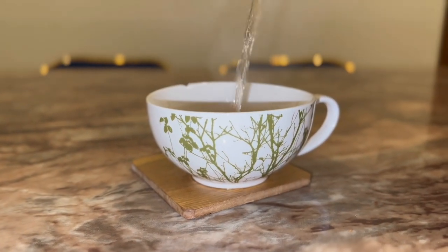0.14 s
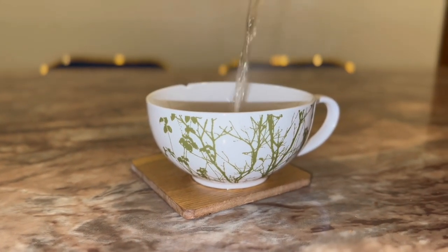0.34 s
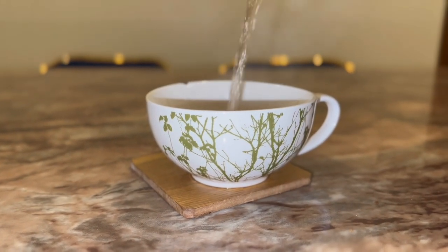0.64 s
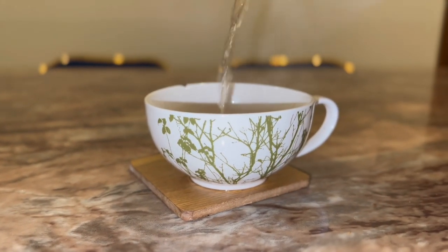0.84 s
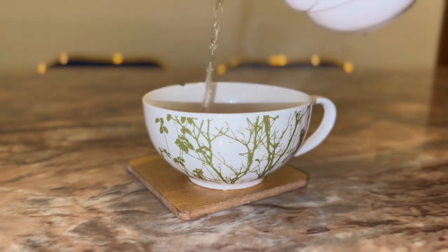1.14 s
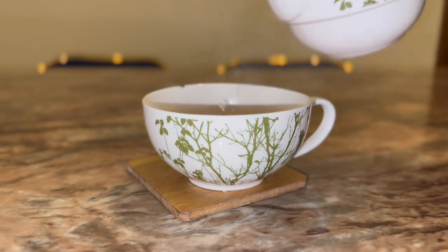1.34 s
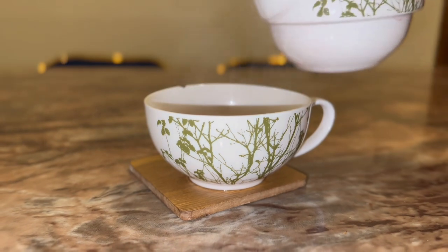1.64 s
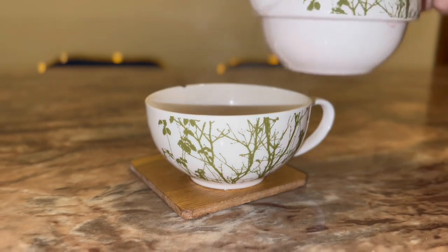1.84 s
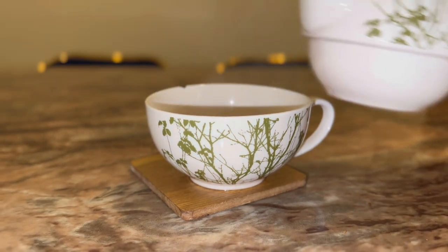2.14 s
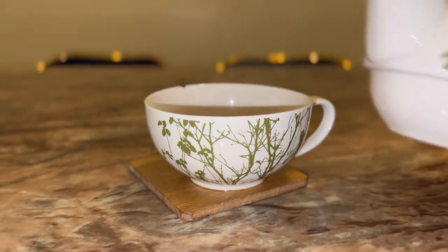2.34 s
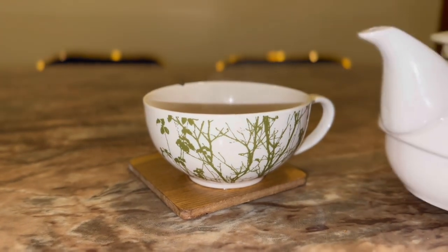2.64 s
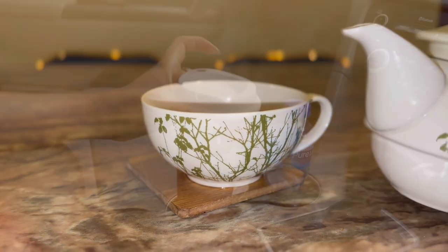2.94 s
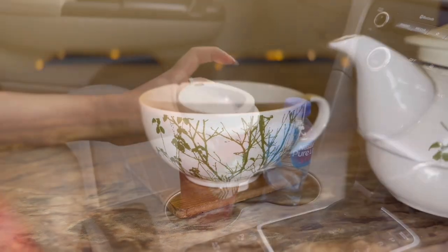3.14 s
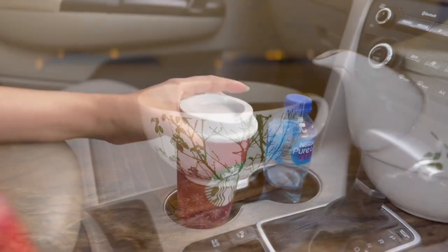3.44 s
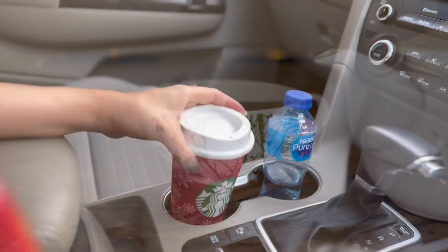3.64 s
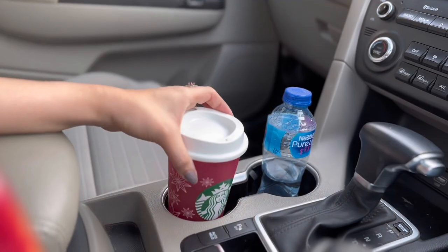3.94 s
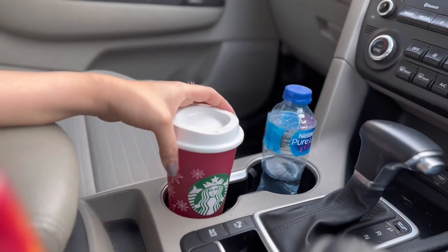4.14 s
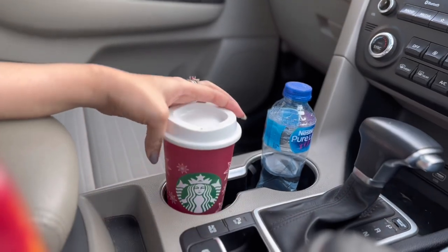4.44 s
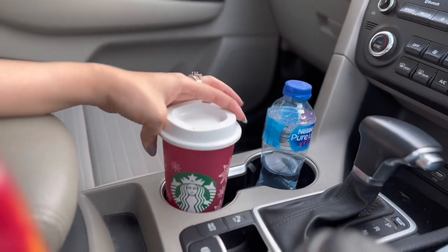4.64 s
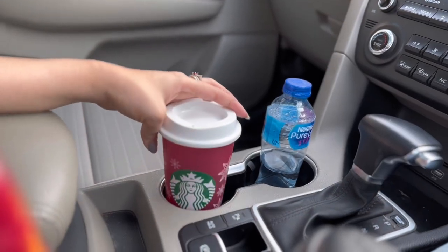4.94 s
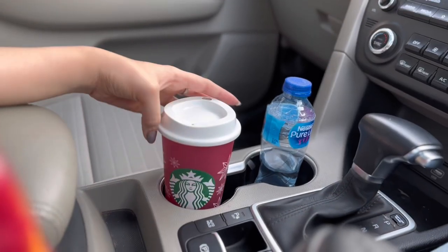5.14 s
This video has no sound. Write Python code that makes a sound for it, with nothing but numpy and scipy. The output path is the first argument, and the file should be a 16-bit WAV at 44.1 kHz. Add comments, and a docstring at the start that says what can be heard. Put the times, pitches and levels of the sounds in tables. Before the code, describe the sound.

Close stereo pickup in a small, quiet room: hot tea streams into a china cup with bubbling plops and bright droplet snaps, then breaks off. The pot's lid taps lightly, the pot lands on the table with a hard, booming knock, and the lid taps again. The room's rumble blends into an idling car, where a paper cup scrapes its holder, thumps down and its plastic lid clacks.

```python
"""Tea runs from a china pot into a full cup: trapped air pockets ring, droplets snap and foam sizzles.
After the stream has stopped, the pot's lid taps, exciting the pot's hollow and damped modes of its china.
The pot is set down: a noisy contact excites table modes that boom, a small room answers the knock, and
the lid taps once more. The room's rumble fades into an idling car's cabin, both filtered noise, where a
paper cup scrapes its holder in bursts of noise, thumps the console's low modes and clacks its plastic lid."""
import sys
import numpy as np
from scipy import signal
from scipy.fft import rfft, irfft, next_fast_len
from scipy.io import wavfile
from scipy.ndimage import map_coordinates

SR = 44100
rng = np.random.default_rng(int(sys.argv[2]) if len(sys.argv) > 2 else 0)


def unload_wav(signal):
    """Save mono or channel-first audio to the path in sys.argv[1] as 16-bit WAV at rate SR, clipped to [-1, 1]."""
    wavfile.write(
        sys.argv[1],
        SR,
        np.round(np.clip(np.atleast_2d(signal).T, -1, 1) * 32767).astype(np.int16),
    )


N = 233456
TIME = np.arange(N) / SR
AGE = TIME[:SR]  # time since the onset of a single event
TOP_HZ = 15900  # upper band limit


def amp(db):
    """Decibel law: a level becomes an amplitude gain."""
    return 10 ** (np.asarray(db) / 20)


def unit(x):
    """Normalisation of power: scale to rms 1."""
    return x / np.sqrt(np.mean(x ** 2) + 1e-20)


def along(points, hz):
    """Logarithmic frequency scale: interpolate (f/Hz, value) points on it."""
    f, v = np.transpose(points)
    return np.interp(np.log(hz + 1), np.log(f + 1), v)


def pan(db):
    """Interaural level difference: left and right gains, positive to the left."""
    return amp([[db / 2], [-db / 2]])


def add(track, s, sound):
    """Superposition: mix a sound into a track at time s."""
    part = track[..., max(round(s * SR), 0):][..., :sound.shape[-1]]
    part += sound[..., :part.shape[-1]]


def ramp(start, length):
    """Linear crossover: rise from 0 at start to 1 over length seconds."""
    return np.clip((TIME - start) / length, 0, 1)


def fade(t, rise, t60):
    """Exponential damping after a quick swell; the decay falls 60 dB in t60 seconds."""
    return (1 - np.exp(-t / rise)) * np.exp(-np.log(1000) * t / t60)


def wobble(rate):
    """Band-limited fluctuation: a smooth random curve with rate knots a second."""
    knots = rng.standard_normal(int(N * rate / SR) + 4)
    return map_coordinates(knots, [TIME * rate])


def filtered(x, response):
    """Linear filtering: multiply the spectrum by a response of frequency."""
    m = next_fast_len(x.shape[-1] + SR // 4)
    spectrum = rfft(x, m) * response(np.fft.rfftfreq(m, 1 / SR))
    return irfft(spectrum, m)[..., :x.shape[-1]]


# left-right coherence in the room: (f/Hz, correlation)
ROOM_COHERENCE = [(60, 0.97), (130, 0.95), (290, 0.84), (640, 0.17), (1400, 0.05), (6000, 0.041),
                  (14000, .5)]
# left-right coherence in the car: (f/Hz, correlation)
CAR_COHERENCE = [(60, 1), (170, 0.93), (500, 0), (1600, 0.019), (5000, 0), (15000, 0.54)]


def noise(spectrum, coherence, size=N, tilt_db=0):
    """Partial coherence: coloured mid and side noises, mixed to stereo of rms 1."""
    def mid_side_response(hz):
        colour = amp(along(spectrum, hz) + tilt_db * np.log2(hz + 1))
        angle = np.arccos(np.clip(along(coherence, hz), -1, 1)) / 2
        return colour * [np.cos(angle), np.sin(angle)]
    mid, side = filtered(rng.standard_normal((2, size)), mid_side_response)
    return unit(np.array([mid + side, mid - side]))


def ring(modes, rise, scatter_db, apart_hz):
    """Modal synthesis: damped modes at random strengths, the higher ones out of step between the ears."""
    out = np.zeros((2, SR))
    for hz, db, t60 in modes:
        skew = np.array([[1], [-1]]) * rng.choice([-1, 1]) * np.pi / 4 * hz / (hz + apart_hz)
        phase = rng.uniform(0, 2 * np.pi) + skew
        strength = amp(db + scatter_db * rng.standard_normal())
        out += strength * np.sin(2 * np.pi * hz * AGE + phase) * fade(AGE, rise, t60)
    return out


# reverberation time of the walls: (f/Hz, t60/s)
WALL_DECAY = [(100, 0.95), (300, 0.8), (1000, 0.56), (3000, 0.65), (8000, 0.16), (15000, 0.098)]


def room(x):
    """Diffuse reverberation: convolve with noise whose every frequency dies at its own speed."""
    hz, t, z = signal.stft(rng.standard_normal((2, SR)), SR, nperseg=256)
    decay = np.exp(-np.log(1000) * t / along(WALL_DECAY, hz)[:, None])
    tail = signal.istft(z * decay, SR, nperseg=256)[1][:, :SR]
    tail = tail * (1 - np.exp(-(AGE / 0.0063) ** 2))  # the echoes take a few ms to gather
    return signal.fftconvolve(x, tail / np.linalg.norm(tail[0]), axes=1)[:, :N]


def bubble(hz, cycles, climb):
    """Bubble resonance: an air pocket rings, its pitch climbing as it nears the surface."""
    t = AGE[:int(SR * cycles / hz) + 2]
    life = cycles / hz
    phase = 2 * np.pi * hz * t * (1 + climb * (t / life - .5))
    wave = np.sin(phase) * fade(t, 1 / hz, life)
    return wave / np.abs(wave).max()


def swarm(end, rate, hz, octaves, cycles, spread_db):
    """Random superposition: bubbles up to time end, mostly faint, each panned; rms 1 while they last."""
    out = np.zeros((2, N))
    for when, size, pitch, place in rng.random((int(rate * end), 4)):
        own_hz = min(hz * 2 ** (octaves * (2 * pitch - 1)), TOP_HZ)
        gain = amp(spread_db * size ** 2) * pan(10 * (place - .5))
        add(out, when * end, gain * bubble(own_hz, cycles, climb=0.13))
    return unit(out) * np.sqrt(end * SR / N)


def snap(hz):
    """Impact noise: a droplet's brief crack on the surface, a noise band centred on hz."""
    band = [(hz / 4, -18), (hz * 0.7, -11), (hz, 0), (hz * 1.35, -13), (hz * 1.8, -16)]
    crack = noise(band, ROOM_COHERENCE, size=2048)
    return crack * fade(AGE[:crack.shape[1]], 0.00115, 0.011)


def plop(hz):
    """Air entrainment: a pocket pinches off with a short splash and rings."""
    spectrum = [(400, -46), (800, -1.5), (1300, 5.5), (2000, -18), (4000, -15.5), (9000, -37.5)]
    splash = noise(spectrum, ROOM_COHERENCE, size=2048)
    out = amp(-6) * splash * fade(AGE[:splash.shape[1]], .0004, .02)
    add(out, 0, amp(0.5) * bubble(hz, cycles=13.0, climb=0.13))
    return out


POCKET_DELAY_S, SNAP_HZ = .0008, 8620  # from the snap to the ring; the snap's centre
POUR_END_S, TAPER_S = 1.42, .12  # the stream thins out and breaks off
GURGLE_DB, GURGLE_SAG_DB_PER_S = -58.5, 0.5  # bed of large bubbles, calming as the cup fills
FOAM_DB, FOAM_SAG_DB_PER_S = -70.5, 18  # the foam's hiss, which outlasts the stream
SPRAY_DB, SURGE_DB = -63, 1  # the fine spray; how unevenly it comes
DROPLETS_PER_S, DROPLET_DB, DROPLET_SPREAD_DB = 26, -53.5, 13.5  # random droplets
# lumps of the stream hitting the tea, levels before panning:
# (t/s, plop level/dB, plop f/Hz, snap level/dB)
STREAM_LUMPS = [(0.049, -34.5, 810, -57.5), (0.079, -35.5, 830, -47), (0.12, -42, 1000, -40),
                (0.1358, -32, 1250, -35.5), (0.157, -37, 895, -49), (0.2, -43, 860, -52),
                (0.2727, -31, 1090, -25), (0.336, -36, 955, -28.5), (0.3595, -35, 920, -36),
                (0.396, -33.5, 990, -50), (0.425, -38.5, 670, -55), (0.497, -44.5, 830, -50),
                (0.542, -39, 747, -53), (0.5603, -41.5, 830, -38.5), (0.644, -40.5, 700, -53),
                (0.6886, -42, 990, -41), (0.737, -40, 710, -56), (1.037, -43, 900, -29),
                (1.051, -37.5, 916, -59), (1.1644, -35.5, 970, -31), (1.2165, -41.5, 886, -40.5),
                (1.302, -38.5, 730, -49)]
# stray droplets snapping on the surface, levels before panning: (t/s, level/dB, f/Hz)
STRAY_DROPLETS = [(0.3057, -35, 8760), (0.6594, -37.5, 14000), (0.689, -33, 13000), (1.005, -36.5, 14000),
                  (1.115, -34.5, 4130), (1.202, -36, 10000), (1.243, -37.5, 14000)]
# spectrum of spray and foam: (f/Hz, level/dB)
SPRAY_SPECTRUM = [(900, 1), (1800, -1), (3200, 1), (5000, -14), (7000, -4), (9000, -4), (12000, -11.5),
                  (15500, -10)]


def pour():
    """Bubble acoustics: the stream traps large bubbles, throws droplets and keeps a bed of small ones."""
    plops, spits = np.zeros((2, N)), np.zeros((2, N))
    for s, db, hz, snap_db in STREAM_LUMPS:
        add(spits, s, amp(snap_db) * snap(SNAP_HZ))
        add(plops, s + POCKET_DELAY_S, amp(db) * plop(hz))
    for s, db, hz in STRAY_DROPLETS:
        add(spits, s, amp(db) * snap(hz))
    for when, size, pitch in rng.random((int(DROPLETS_PER_S * POUR_END_S), 3)):
        gain = amp(DROPLET_DB + DROPLET_SPREAD_DB * size ** 2)
        own_hz = SNAP_HZ * 2 ** (1.4 * pitch - .7)
        add(spits, when * (POUR_END_S - TAPER_S / 2), gain * snap(own_hz))

    flow = 1 - ramp(POUR_END_S - TAPER_S, TAPER_S)
    gurgle = flow * amp(GURGLE_DB - GURGLE_SAG_DB_PER_S * TIME)
    spray = flow * amp(SPRAY_DB + SURGE_DB * wobble(14))
    large = swarm(1.45, rate=190, hz=1000, octaves=.65, cycles=13, spread_db=14)
    small = swarm(1.45, rate=220, hz=3100, octaves=.7, cycles=18, spread_db=12)
    tiny = swarm(1.45, rate=600, hz=9300, octaves=.75, cycles=24, spread_db=17)
    plops = pan(6.8) * (plops + gurgle * large)
    spits = pan(1.5) * spits + spray * (amp(-5.5) * small + amp(-11.0) * tiny)
    foam = amp(FOAM_DB - FOAM_SAG_DB_PER_S * np.maximum(TIME - POUR_END_S, 0))
    mist = (amp(-8) * spray + foam) * noise(SPRAY_SPECTRUM, ROOM_COHERENCE)
    return plops + amp(-13.0) * room(plops) + spits + amp(-7.0) * room(spits) + mist


# modes of the table under the pot: (f/Hz, level/dB, t60/s)
TABLE_MODES = [(63.8, -19, 0.6), (101, -6.5, 0.22), (155, -15, 1.4), (180.3, -13.5, .4), (251.6, -18, 1.6),
               (266.5, -11.5, 0.53), (293, -8, 0.28), (362, -6.5, .28), (382, -9.5, 0.77), (438, -12, 0.46),
               (481, -7, 0.41), (503.3, -5, 0.17), (596, -11, 0.31), (608, -7, 0.46), (663, 3.5, 0.23),
               (694, 2, 0.27), (745, -11.5, 0.297), (852, -9, 0.4), (961, -7.5, 0.6), (1052, -5.5, 0.36),
               (1125, -8, 0.2), (1296, -11, .3), (1330, -11.5, .3), (1381, -10.5, .32),
               (1429, -17.5, 0.408), (1690, -17, 0.381), (1758, -16, 0.4), (2200, -40, 0.44),
               (2650, -29, 0.39), (3770, -24, 0.094)]
# contact noise of the pot's foot: (f/Hz, level/dB)
FOOT_CONTACT = [(40, -27), (90, -19.5), (200, -5.5), (400, -3), (700, -3), (1000, -3), (1400, -9),
                (2000, -23.5), (3200, -41), (5000, -46), (9000, -47.5), (16000, -54.5)]


def teapot():
    """Impact excitation: the pot's foot grazes the table, then strikes it and the top booms."""
    out = np.zeros((2, N))
    contact = noise(FOOT_CONTACT, ROOM_COHERENCE, size=SR) * fade(AGE, 0.00022, 0.057)
    clonk = np.sin(2 * np.pi * 700 * AGE) * fade(AGE, .0004, 0.037)  # the wood right under the foot
    add(out, 2.6425, amp(-39) * contact)
    add(out, 2.6478, amp(-11.5) * contact + amp(-11.5) * clonk)
    out += amp(-6.5) * room(out)
    add(out, 2.6478, amp(-20) * ring(TABLE_MODES, rise=0.00026, scatter_db=0.7, apart_hz=200))
    return pan(1.8) * out


# the lid tapping on the pot, levels relative: (t/s, hollow level/dB, hollow f/Hz, hollow t60/s,
# pot level/dB, lid level/dB, table level/dB)
LID_TAPS = [(2.1452, -27.5, 563, 0.021, -43, -39, -58), (2.2128, -31.5, 455, 0.074, -37.5, -48, -56),
            (2.522, -37, 500, 0.037, -59.5, -62.5, -73.5), (3.3249, -21, 490, 0.031, -31.5, -57, -41)]
# modes of the pot's china: (f/Hz, level/dB, t60/s)
POT_MODES = [(823, 8, 0.028), (990, 11.5, 0.086), (2460, -4, .05), (3837, 2, 0.068), (5350, -1.5, .028),
             (6820, -7.5, .09), (8400, -7.5, 0.089), (13500, -23, .07)]
# modes of the lid's china: (f/Hz, level/dB, t60/s)
LID_MODES = [(860, 10.5, 0.023), (2900, -3, 0.025), (5380, -6.5, 0.13), (9250, -5.5, 0.13),
             (10290, -7.5, 0.098)]


def lid():
    """Coupled resonators: each tap sounds the pot's hollow, rings both pieces of china and stirs the table."""
    out = np.zeros((2, N))
    spectrum = [(300, -4.5), (800, 6.5), (2000, -14), (4500, -15.5), (9000, -31.0), (16000, -36)]
    for s, db, hz, t60, pot_db, lid_db, table_db in LID_TAPS:
        hollow = amp(db + 2.5) * np.sin(2 * np.pi * hz * AGE) * fade(AGE, 0.002, t60)
        crack = noise(spectrum, ROOM_COHERENCE, size=SR) * fade(AGE, 0.00032, 0.037)
        pot = ring(POT_MODES, rise=.0003, scatter_db=1.5, apart_hz=1500)
        cap = ring(LID_MODES, rise=.0003, scatter_db=1.5, apart_hz=1500)
        # so light a tap leaves the table's lowest modes still
        table = ring(TABLE_MODES[7:], rise=.002, scatter_db=1, apart_hz=250)
        china = amp(pot_db) * (crack + amp(-17.0) * pot) + amp(lid_db - 10.5) * cap
        add(out, s, hollow + china + amp(table_db - 4) * table)
    return pan(1) * (out + amp(-15) * room(out))


SCRAPE_RISE_S = .0016  # time constant of each scrape's swell
RUB_DB, RUB_SAG_DB_PER_S = -65.5, 9.5  # the grip slackens
GRIP_S, RELEASE_S = 4.09, 4.71  # the fingers work on the seated cup
# the cup touching its holder, levels relative: (t/s, level/dB, t60/s, tilt/(dB per octave))
CUP_SCRAPES = [(3.0865, -38.5, 0.067, 0.5), (3.1, -36, .063, 2), (3.394, -40, 0.17, 0),
               (3.411, -39.5, 0.069, 1.5), (3.451, -46, 0.32, 0), (3.595, -47, 0.12, 5),
               (3.607, -43, .09, -4), (3.792, -52, .14, 3), (3.818, -30.5, 0.077, -0.6),
               (3.995, -60, 0.072, 2), (4.204, -40.5, 0.095, -2.5), (4.222, -39.5, 0.11, -0.2),
               (4.672, -56, 0.158, 6), (4.693, -45, 0.1, -6)]
# spectrum of scraped paper: (f/Hz, level/dB)
PAPER_SPECTRUM = [(120, -19), (300, 7.5), (650, -6), (1050, -1), (1400, -18), (1750, -12.5), (2100, -16),
                  (2800, -13.5), (4500, -29.5), (7000, -38), (10000, -36), (16000, -54)]
# weight landing on the console, levels relative: (t/s, level/dB)
CONSOLE_BUMPS = [(3.607, -29.5), (3.648, -33), (3.828, -17.5), (4.281, -43.5)]
# modes of the hollow console: (f/Hz, level/dB, t60/s)
CONSOLE_MODES = [(56.6, -4.5, 0.39), (79.3, 2.5, 0.27), (118.8, 10.5, 0.11), (136.5, -0.5, 0.217),
                 (183, -10, 0.15), (260.5, -16.5, 0.21)]


def paper_cup():
    """Friction and impact: the cup's wall scrapes the holder; its weight thumps the hollow console."""
    scrapes, thumps, thump = np.zeros((2, N)), np.zeros(N), np.zeros(SR)
    for s, db, t60, tilt_db in CUP_SCRAPES:
        stroke = fade(AGE, SCRAPE_RISE_S, t60)
        grain = noise(PAPER_SPECTRUM, CAR_COHERENCE, size=SR, tilt_db=tilt_db)
        add(scrapes, s, amp(db) * stroke / stroke.max() * grain)
    for hz, db, t60 in CONSOLE_MODES:
        thump += amp(db) * np.sin(2 * np.pi * hz * AGE) * fade(AGE, 0.013, t60)
    for s, db in CONSOLE_BUMPS:
        add(thumps, s, amp(db) * thump)

    # fingers stick and slip on the cup before they let go
    grip = ramp(GRIP_S, .02) - ramp(RELEASE_S, 0.022)
    slips = amp(4.5 * wobble(45))
    rub_spectrum = [(400, 5), (750, 8), (1050, 13), (1500, -21),
                    (2900, -8), (4000, -35), (10000, -24), (16000, -32)]
    rub_level = amp(RUB_DB - RUB_SAG_DB_PER_S * (TIME - GRIP_S))
    rub = rub_level * slips * grip * noise(rub_spectrum, CAR_COHERENCE)
    return pan(-2.0) * (amp(-1.5) * scrapes + rub) + thumps


# the cup's plastic lid flexing, levels relative: (t/s, level/dB)
LID_CLACKS = [(3.8177, -33), (3.999, -61), (4.2219, -35.5)]
# modes of the plastic lid: (f/Hz, level/dB, t60/s)
PLASTIC_MODES = [(1004, 2.5, 0.085), (1200, 2, 0.021), (1704, -1.5, 0.037), (2460, -5, 0.032),
                 (2754, -7, 0.048), (3060, -12, 0.033)]


def cup_lid():
    """Damped shell modes: the thin plastic lid clacks as the cup lands and is pressed home."""
    out = np.zeros((2, N))
    for s, db in LID_CLACKS:
        add(out, s, amp(db - 6) * ring(PLASTIC_MODES, rise=.0005, scatter_db=1.5, apart_hz=1500))
    return pan(-7.0) * out


CAR_IN_S, CAR_FADE_S = 3.16, 0.59  # the cabin fades in
SIZZLE_S, SIZZLE_DB, SIZZLE_RISE_S, SIZZLE_T60_S = .275, -47.5, 0.054, .7
# foam left by the hardest splash: (f/Hz, level/dB)
SIZZLE_SPECTRUM = [(1500, -15), (3300, -1), (5000, -4), (6100, -3), (6450, 7.5), (6900, -4), (9000, -4.5),
                   (12000, -24), (15500, -25)]
# the faint squeak: (f/Hz, level/dB)
SQUEAK_SPECTRUM = [(3500, -19.5), (4400, -12.5), (4650, 1), (5000, -16), (5500, -7.5), (6000, -16.5),
                   (8000, -25.5)]


def froth():
    """Decaying foam noise: a sizzle after the hardest splash, ticks, a faint squeak as the pot is raised."""
    ticks_fade = 1 - ramp(CAR_IN_S - CAR_FADE_S, 2 * CAR_FADE_S)
    ticks = swarm(3.3, rate=40, hz=11500, octaves=.35, cycles=8, spread_db=10)
    squeak = noise(SQUEAK_SPECTRUM, ROOM_COHERENCE) * np.exp(-((TIME - 1.7) / 0.067) ** 2)
    out = amp(-86) * ticks_fade * ticks + amp(-60.0) * squeak
    sizzle = noise(SIZZLE_SPECTRUM, ROOM_COHERENCE, size=SR) * fade(AGE, SIZZLE_RISE_S, SIZZLE_T60_S)
    add(out, SIZZLE_S, amp(SIZZLE_DB) * sizzle)
    return out


ROOM_DB, ROOM_OUT_S, ROOM_FADE_S = -51.5, 3.91, 1  # room rumble; when it is gone; how long it fades
IDLE_DB, HISS_DB, HISS_GROWTH_DB_PER_S = -50, -69, 2.5  # engine rumble; vents' hiss, slowly growing
DIP_EDGE_S = 0.036  # length of the ramps into and out of each level dip
# brief level dips of the background: (start t/s, end t/s, hiss level change/dB, idle level change/dB)
LEVEL_DIPS = [(3.872, 4.093, -10, -2), (4.702, 5.041, -17.5, -5.5)]
# the room's rumble: (f/Hz, level/dB)
ROOM_SPECTRUM = [(12, -47.5), (20, -36.5), (55, -1.5), (77, -1.5), (113, -5.5), (216, -5.5), (347, -9.5),
                 (410, -14.5), (660, -16.5), (1370, -19.5), (4670, -41.5), (7520, -45.5), (8410, -41.5),
                 (14700, -59), (16000, -67)]
# the idling engine: (f/Hz, level/dB)
IDLE_SPECTRUM = [(20, -16), (50, 0.5), (90, -3), (135, 1), (180, -15.5), (250, -14), (400, -22), (700, -41),
                 (1300, -81)]
# the vents' hiss: (f/Hz, level/dB)
VENT_SPECTRUM = [(200, -11), (400, -3), (700, -11.5), (1050, -7), (1500, -10), (2100, -11.5), (2800, -11),
                 (4000, -21), (7000, -24.5), (10000, -21.5), (13000, -35.5), (16000, -26.5)]


def background():
    """Filtered noise under gain envelopes: room rumble, then a car's idle and hiss, twice briefly turned down."""
    indoors = amp(ROOM_DB) * (1 - ramp(ROOM_OUT_S - ROOM_FADE_S, ROOM_FADE_S) ** 2)
    hiss_dip, idle_dip = np.zeros(N), np.zeros(N)
    for start, end, hiss_db, idle_db in LEVEL_DIPS:
        dip = ramp(start, DIP_EDGE_S) - ramp(end - DIP_EDGE_S / 2, DIP_EDGE_S)
        hiss_dip += hiss_db * dip
        idle_dip += idle_db * dip
    idle = amp(IDLE_DB + idle_dip) * noise(IDLE_SPECTRUM, CAR_COHERENCE)
    vent_level = amp(HISS_DB + HISS_GROWTH_DB_PER_S * (TIME - CAR_IN_S) + hiss_dip)
    vents = vent_level * noise(VENT_SPECTRUM, CAR_COHERENCE)
    whine = amp(-78.0) * noise([(1500, -32), (2100, -10.5), (2400, -13), (3000, -40)], CAR_COHERENCE)
    car = ramp(CAR_IN_S, CAR_FADE_S) * (pan(-2.9) * idle + pan(-1) * vents + whine)
    return pan(1.6) * indoors * noise(ROOM_SPECTRUM, ROOM_COHERENCE) + car


def scene():
    """Superposition of all sources: the tea table, then the car."""
    return pour() + teapot() + lid() + paper_cup() + cup_lid() + froth() + background()


def record(dry):
    """Band limitation: the microphone thins the deepest bass and keeps nothing above the band limit."""
    highpass = signal.butter(2, 32, btype="highpass", fs=SR, output="sos")
    thinned = signal.sosfilt(highpass, dry)
    return filtered(thinned, lambda hz: hz < TOP_HZ)


dry = scene()
out = record(dry)
unload_wav(out)
```